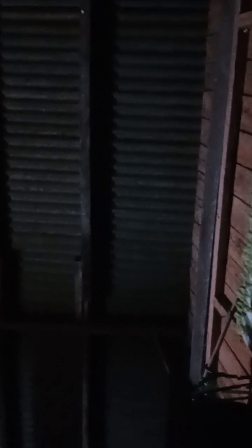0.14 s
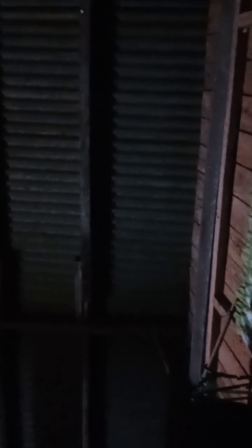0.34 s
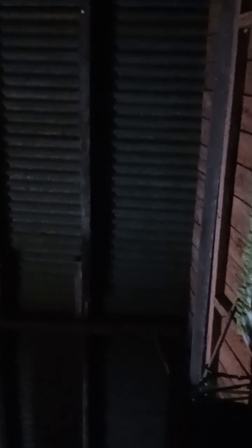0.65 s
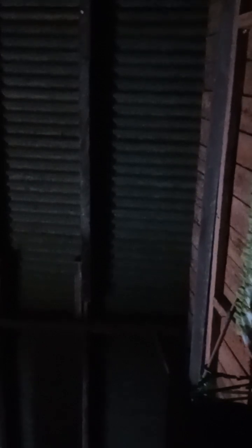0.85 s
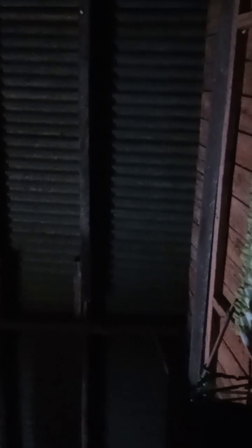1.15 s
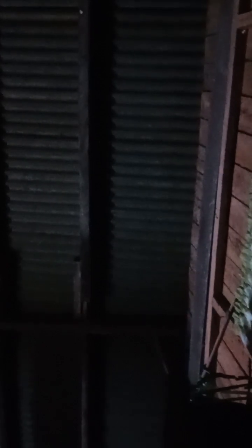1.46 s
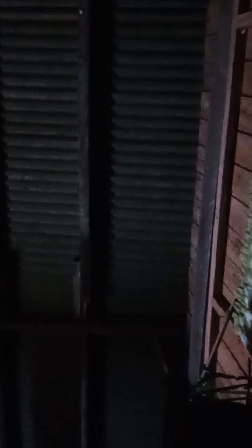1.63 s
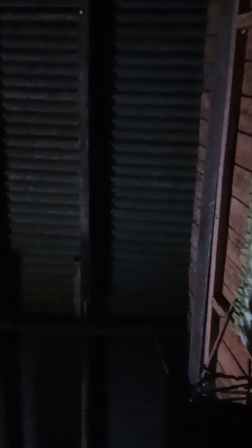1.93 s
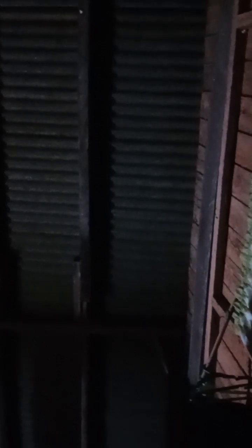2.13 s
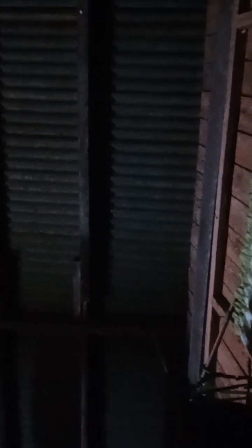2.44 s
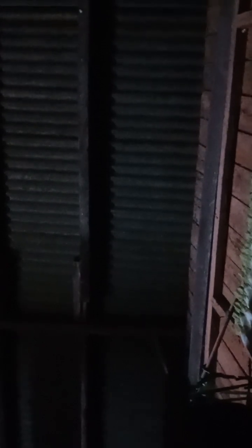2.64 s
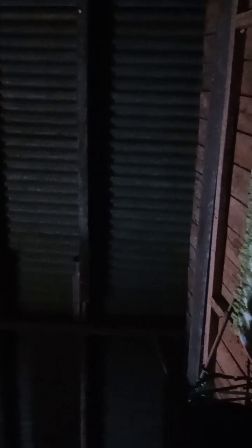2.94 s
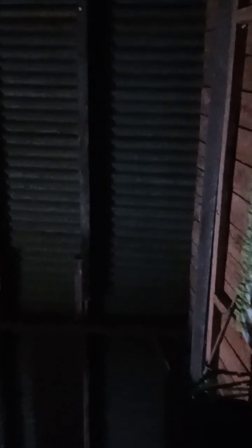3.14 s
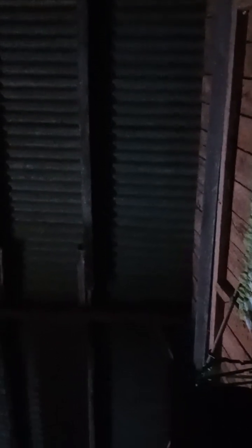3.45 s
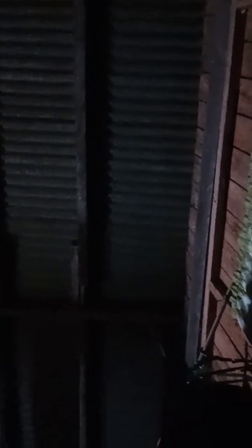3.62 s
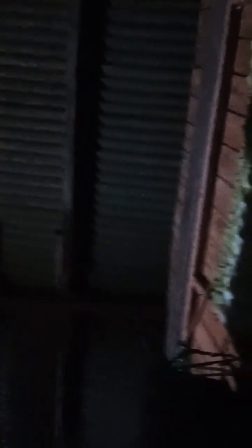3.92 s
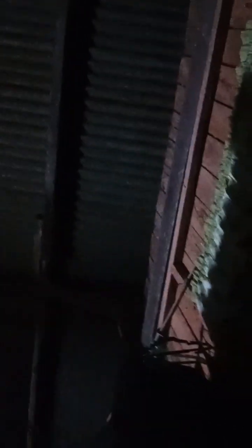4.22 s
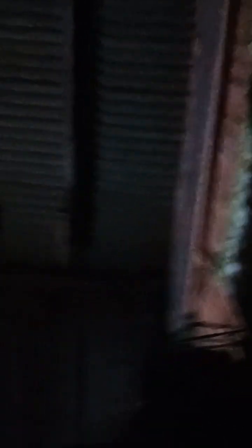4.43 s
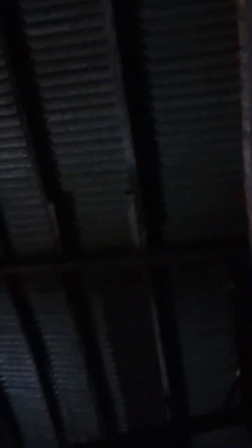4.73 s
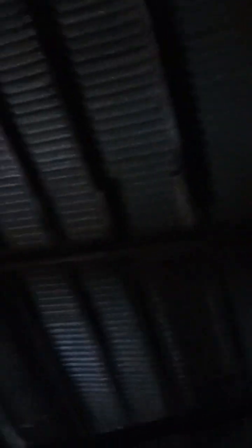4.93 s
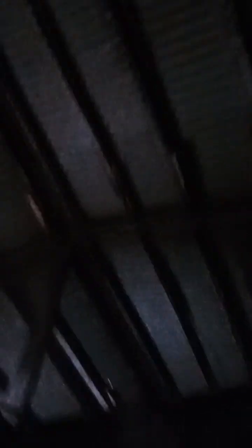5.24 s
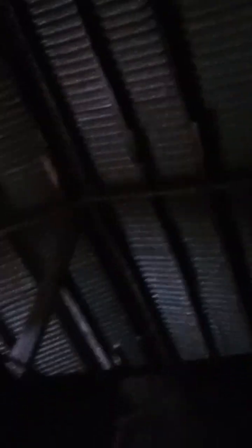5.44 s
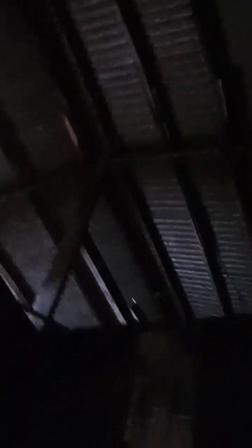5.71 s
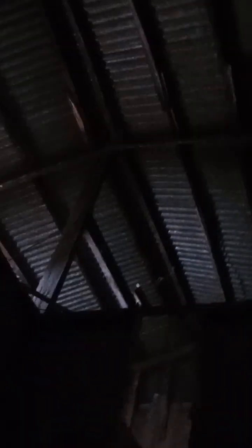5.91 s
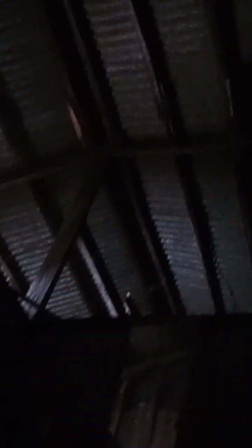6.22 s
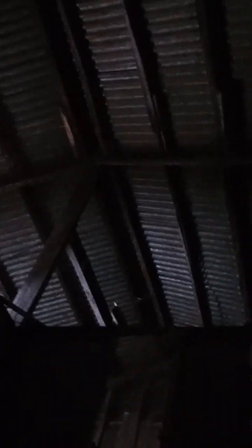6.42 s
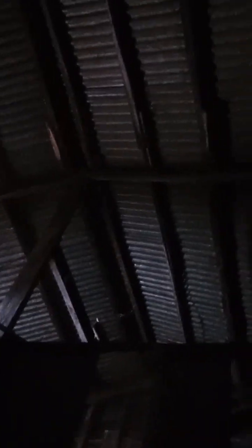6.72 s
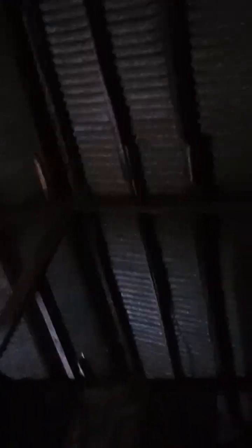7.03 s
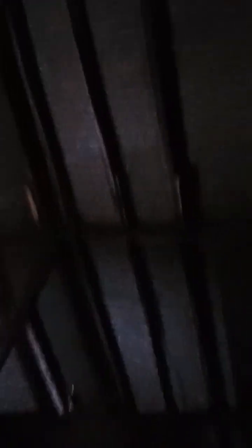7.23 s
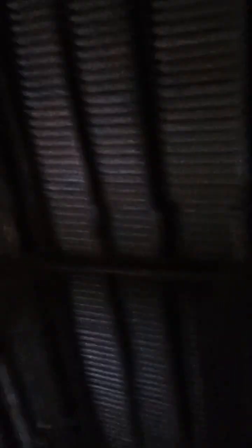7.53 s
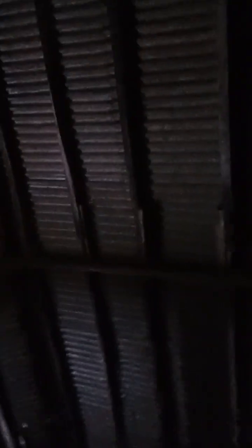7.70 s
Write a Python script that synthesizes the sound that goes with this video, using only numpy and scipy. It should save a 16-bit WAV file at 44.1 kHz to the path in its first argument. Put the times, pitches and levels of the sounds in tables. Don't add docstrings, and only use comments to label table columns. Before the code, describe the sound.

A continuous wall of rain on sheet metal, heard from inside an open-sided shed on a hand-held phone. The drumming is dense and even, lightly grainy, with no separate drops standing out, and a quieter fine hiss sits over it. Low hum, faint wind thumps and weak cricket chirps lie far below. Noise suppression makes weak upper tones flicker; late on, the whole rain dulls a little.

```python
import sys
import numpy as np
from scipy import signal
from scipy.fft import rfft, irfft
from scipy.io import wavfile
from scipy.ndimage import uniform_filter1d

SR = 44100
rng = np.random.default_rng(int(sys.argv[2]) if len(sys.argv) > 2 else 0)


def undo_db(level):
    steps = np.asarray(level, float) / 20
    return 10 ** steps


def output_pcm(signal):
    pcm = np.clip(np.atleast_2d(signal).T, -1, 1) * 32767
    wavfile.write(sys.argv[1], SR, np.round(pcm).astype(np.int16))


N = 346800


def on_log_hz(table, hz):
    f, value = np.transpose(table)
    return np.interp(np.log(np.maximum(hz, 1)), np.log(f), value)


def colour(x, gain_db):
    hz = np.fft.rfftfreq(N, 1 / SR)
    y = irfft(rfft(x) * undo_db(gain_db(hz)), N)
    return y / np.std(y)


def drops(per_second, spread_db=1.0, t60_s=0.1454):
    chance = rng.random(N)
    size = rng.exponential(size=N)
    sign = rng.standard_normal(N)
    hits = (chance < per_second / SR) * sign * undo_db(spread_db * size)
    decay = np.exp(-np.log(1000) * np.arange(N) / SR / t60_s)
    tail = rfft(rng.standard_normal(N) * decay)
    return irfft(rfft(hits) * tail / np.abs(tail), N)


def walk(rate):
    hold = int(SR / rate)
    steps = np.repeat(rng.standard_normal(N // hold + 1), hold)
    w = uniform_filter1d(steps, hold)[:N]
    return w / np.std(w)


def bursts(table, rest_db):
    t = np.arange(N) / SR
    swells = sum(undo_db(db) * np.exp(-((t - s) / wide) ** 2) for s, db, wide in table)
    return 20 * np.log10(undo_db(rest_db) + swells)


# (f/Hz, level/dB)
SHEET_TONE = [(140, -54), (230, -26.5), (435, -12), (504, -6), (648, -2), (1180, 0.5), (1750, -1.5),
              (2020, -4), (2370, -11), (2800, -24.5), (3640, -66), (6160, -120)]
# (t/s, peak level/dB, length/s)
HEAVY_DROPS = [(0.02, -43, 0.033), (.26, -53, 0.062), (.45, -43, 0.026), (.74, -43, 0.11),
               (.96, -31, 0.017), (1.09, -47, .05), (1.44, -53, 0.039), (1.62, -40, .05),
               (1.77, -42.5, .03), (1.9, -38, 0.03), (2.08, -50.5, 0.17), (2.49, -49, 0.094),
               (2.71, -55, 0.034), (2.96, -50.5, .13), (3.36, -45.5, 0.045), (3.6, -51, 0.13),
               (4.2, -52.5, .1), (4.4, -52, 0.032), (4.57, -43, 0.088), (4.82, -49, 0.022),
               (5.05, -49, 0.08), (5.27, -43, 0.032), (5.6, -46, 0.051), (6.0, -52, 0.32),
               (6.5, -53.5, .13), (6.75, -62, 0.13), (7.3, -42, 0.096), (7.63, -42, 0.14),
               (7.78, -37, 0.021)]


def drumming():
    sheet = colour(drops(9000), lambda hz: on_log_hz(SHEET_TONE, hz))
    low_band = signal.butter(3, (310, 560), "band", fs=SR, output="sos")
    low = signal.sosfiltfilt(low_band, sheet)
    heavy_db = bursts(HEAVY_DROPS, rest_db=-52)
    low_db = 0.52 * (heavy_db - np.mean(heavy_db))
    return sheet + low * (undo_db(low_db) - 1)


# (f/Hz, level/dB)
RIB_TONE = [(1590, -27), (2700, -7), (2900, -1.5), (3230, 0), (3800, -2.5), (4160, -14), (4500, -18),
            (4670, -27), (4810, -29), (5320, -20.5), (5970, -19.5), (6050, -18), (7860, -57), (13300, -120)]
# f/Hz, width/Hz, level/dB
NARROW_PEAK = (4344, 45, 4)


def pings():
    ring_hz, width_hz, ring_db = NARROW_PEAK

    def tone(hz):
        ring = ring_db / (1 + (2 * (hz - ring_hz) / width_hz) ** 2)
        return on_log_hz(RIB_TONE, hz) + ring

    return colour(drops(9000), tone)


# (f/Hz, level/dB)
SPLASH_TONE = [(5900, -60), (6170, -27), (6350, -5), (6800, -1), (8800, 0), (9350, -6), (9900, -3.5),
               (11400, -11.5), (12100, -9), (13100, -8.5), (13700, -18), (15000, -13), (15450, -10),
               (15650, -60)]


def splash(top_db):
    spray = colour(drops(14000), lambda hz: on_log_hz(SPLASH_TONE, hz))
    top_band = signal.butter(4, 12800, "high", fs=SR, output="sos")
    top = signal.sosfiltfilt(top_band, spray)
    flutter_db = 1.2 * walk(70)
    return spray + top * (undo_db(top_db - np.mean(top_db) + flutter_db) - 1)


# (f/Hz, level/dB)
PUFF_TONE = [(15, -26), (30, -9), (50, -21), (68, 3), (110, 3.5), (180, -5.5), (300, -32), (800, -62)]
# (t/s, peak level/dB, length/s)
PUFFS = [(.18, -58.5, .04), (.35, -55, 0.058), (.59, -55, 0.039), (.71, -62, .04), (.96, -71, .06),
         (1.18, -71, 0.025), (4.38, -67, .04), (1.42, -67, .045), (1.67, -64, .05), (1.9, -71, .12),
         (2.12, -67, 0.027), (2.23, -67, .04), (2.42, -54, .05), (2.58, -66, .08), (2.93, -62, .03),
         (3.06, -64, 0.053), (3.26, -61, .03), (3.37, -61, .05), (3.6, -63, .04), (4.03, -59, 0.041),
         (4.25, -71, 0.08), (4.7, -69, 0.15), (5.31, -65, 0.063), (5.68, -64, .04), (5.03, -67, .04),
         (6.07, -64, .03), (6.8, -59, 0.083), (7.17, -63, .05), (7.35, -66, 0.036), (7.8, -64, .05)]
PORT_HZ, PORT_DB = 72, -6.5


def wind():
    rumble = colour(rng.standard_normal(N), lambda hz: on_log_hz(PUFF_TONE, hz))
    pitch_hz = PORT_HZ * (1 + 0.118 * walk(8.3))
    thump = undo_db(PORT_DB) * np.sin(2 * np.pi * np.cumsum(pitch_hz) / SR)
    lull_db = -74 + 3 * walk(14)
    return (rumble + thump) * undo_db(bursts(PUFFS, lull_db) - 3.0)


# (f/Hz, level/dB)
HUM_TONE = [(30, -42), (60, -14), (110, -2), (180, 2), (240, -6.5), (400, -26), (800, -60)]


def hum():
    return colour(rng.standard_normal(N), lambda hz: on_log_hz(HUM_TONE, hz)) * undo_db(-66.0)


# (t/s, peak level/dB, length/s)
CHIRPS = [(.5, -79, .07), (.62, -81, .04), (.93, -82, .05), (1.18, -77, .07), (1.3, -80, .04),
          (1.6, -79, .05), (1.78, -82, .05), (2.2, -77, .08), (2.72, -78, .05), (3.18, -79, .06),
          (3.42, -77, .07), (3.75, -75, .08), (4.08, -80, .07), (4.69, -79, .04), (4.96, -81, .04),
          (5.08, -81, .03), (5.3, -83, .05), (5.51, -80, .04), (6.0, -83, .08), (6.55, -83, .06),
          (6.75, -85, .04), (7.08, -83, .06), (7.68, -83, .05), (7.8, -81, .03)]
CRICKET_HZ, CRICKET_WIDTH_HZ = 4355, 42


def cricket():
    def tone(hz):
        return np.maximum(-4.3 * ((hz - CRICKET_HZ) / CRICKET_WIDTH_HZ) ** 2, -90)

    wing = colour(rng.standard_normal(N), tone)
    return wing * undo_db(bursts(CHIRPS, rest_db=-90))


# (t/s, turned away 0-1)
TURN = [
    (0, 0),
    (4.8, 0.01),
    (5.4, 0.4),
    (5.9, 1.0),
    (7, .8),
    (7.86, 0.8),
]


def turned_away():
    t, away = np.transpose(TURN)
    return np.interp(np.arange(N) / SR, t, away)


def scene():
    away = turned_away()
    rain = drumming() * undo_db(-34 - 1.24 * away)
    rain = rain + pings() * undo_db(-59 - 2.5 * away)
    rain = rain + splash(top_db=-1.6 * away) * undo_db(-51.5 - 1.15 * away)
    return (rain + wind() + hum() + cricket())[None]


# (f/Hz, steepness of the gate)
GATE_STEEPNESS = [(100, 0.5), (250, 0.71), (420, 1.5), (700, 1.2), (1000, 0.3), (2100, 0), (2500, 1.5),
                  (2900, 5.5), (3900, 6.5), (4300, 1.6), (4800, 1.1), (5300, 0.2), (7000, 0.07),
                  (11500, 0.12), (14000, .03)]


def suppress(x, bins=4, frames=10):
    size, overlap = 1024, 768
    usual_frames = 150
    hz, _, z = signal.stft(x, SR, nperseg=size, noverlap=overlap)
    power = np.abs(z) ** 2
    usual = uniform_filter1d(power, usual_frames, axis=1)
    patch = uniform_filter1d(power / usual, bins, axis=0)
    patch = uniform_filter1d(patch, frames, axis=1)
    steepness = np.clip(on_log_hz(GATE_STEEPNESS, hz), 0, 8)[:, None]
    gate = 1 / (1 + np.maximum(patch, 1e-3) ** -steepness)
    out = z * (gate + undo_db(-11))
    out *= np.sqrt(usual / uniform_filter1d(np.abs(out) ** 2, usual_frames, axis=1))
    return signal.istft(out, SR, nperseg=size, noverlap=overlap)[1][:N]


def top_cut(x):
    return signal.sosfilt(signal.butter(12, 15520, fs=SR, output="sos"), x)


def record(dry):
    mix = suppress(dry[0])[None]
    return top_cut(mix)


dry = scene()
out = record(dry)
output_pcm(out)
```